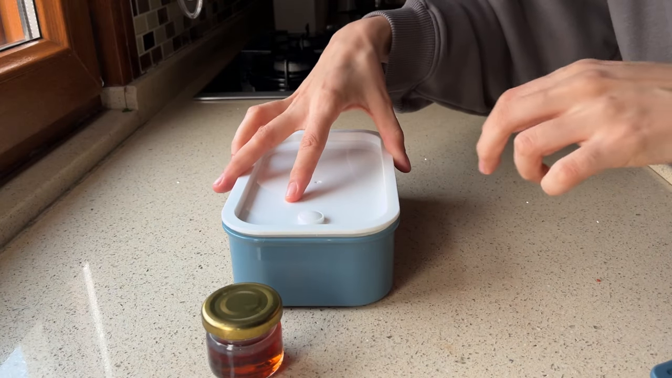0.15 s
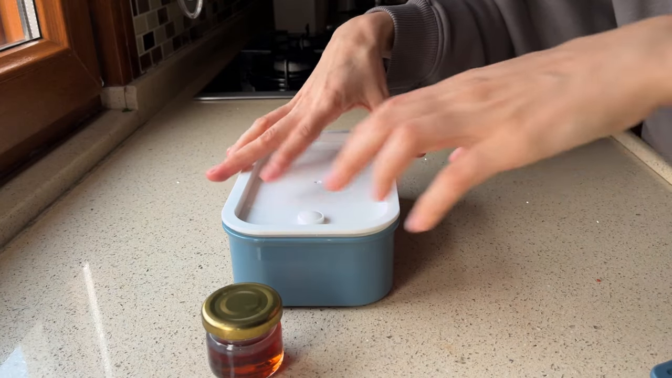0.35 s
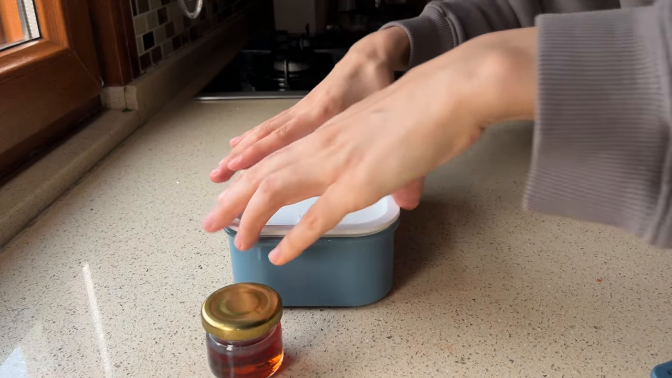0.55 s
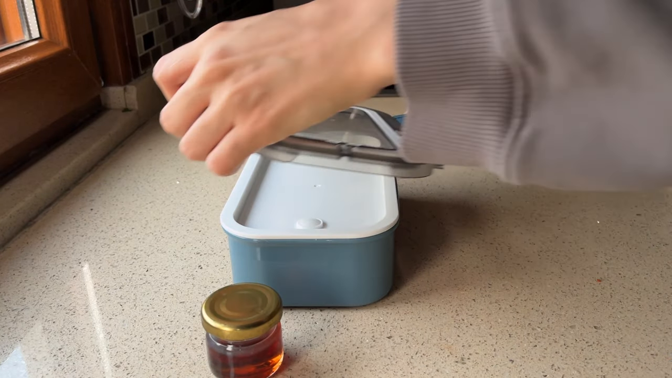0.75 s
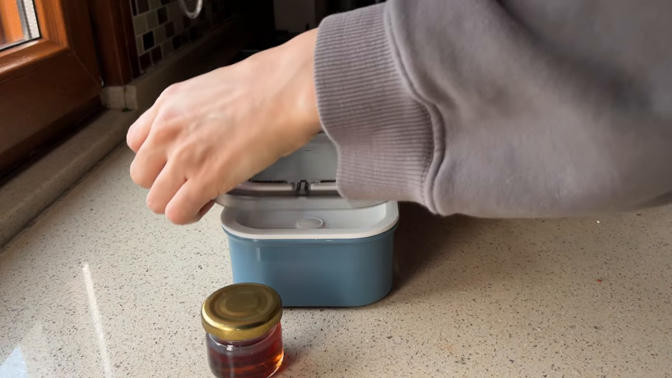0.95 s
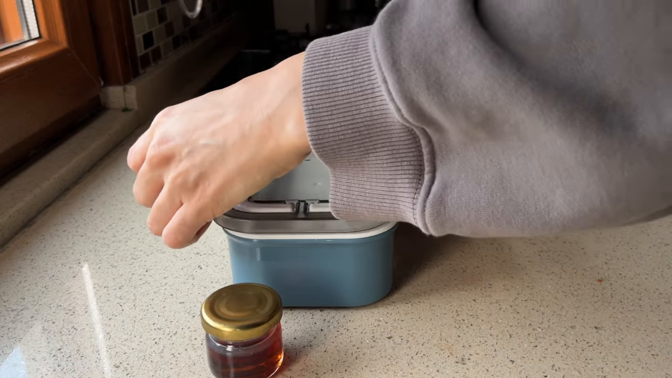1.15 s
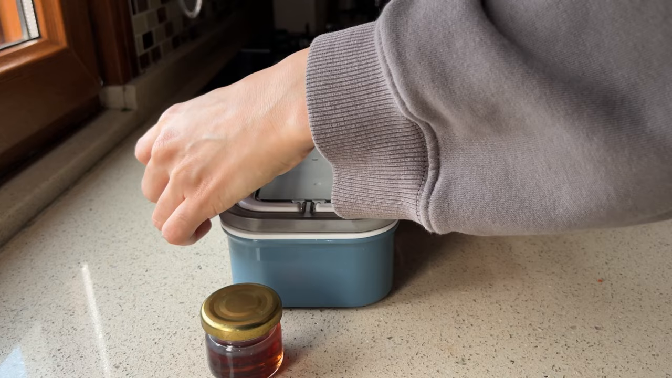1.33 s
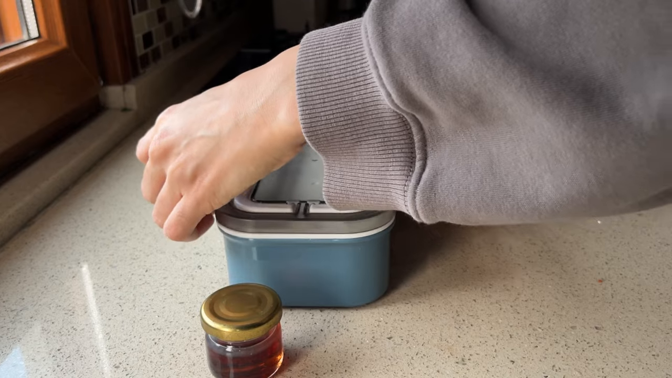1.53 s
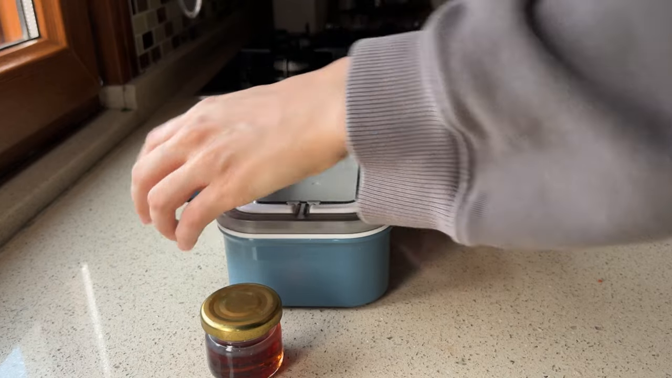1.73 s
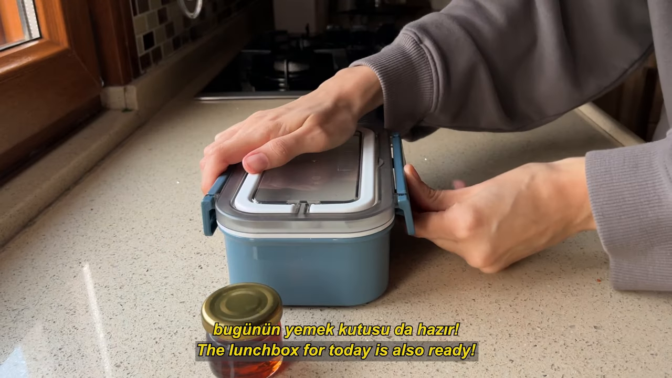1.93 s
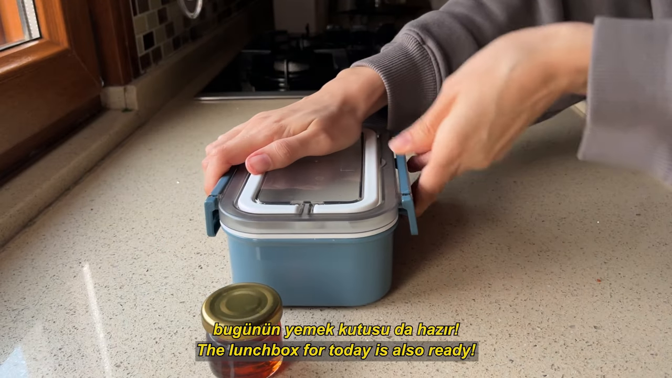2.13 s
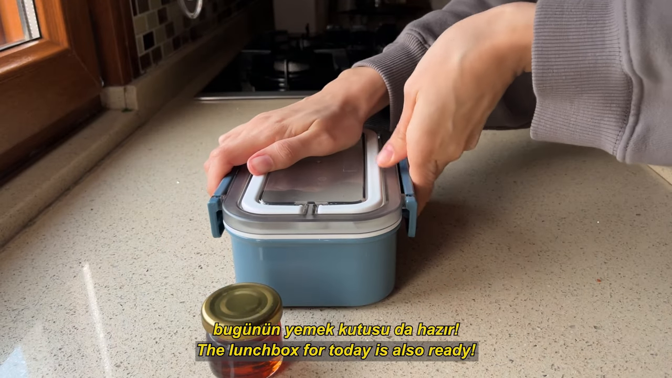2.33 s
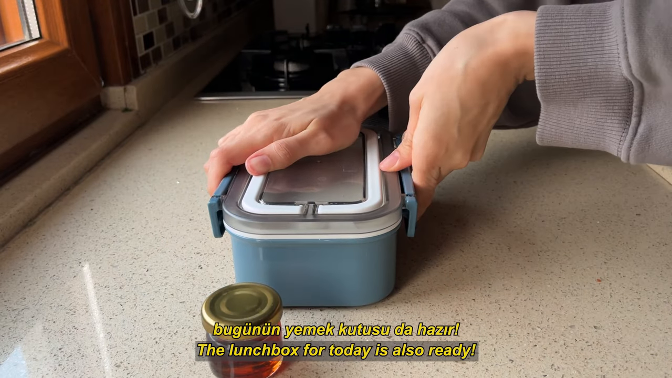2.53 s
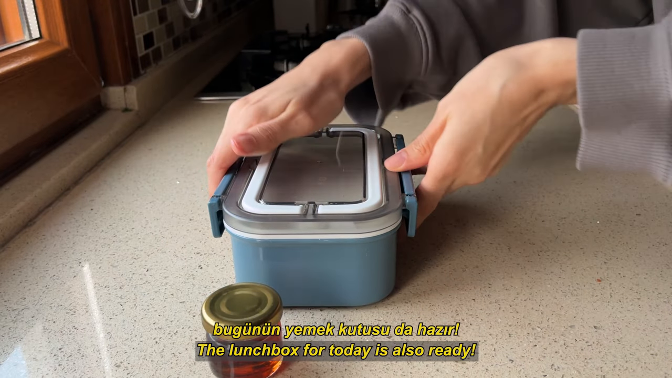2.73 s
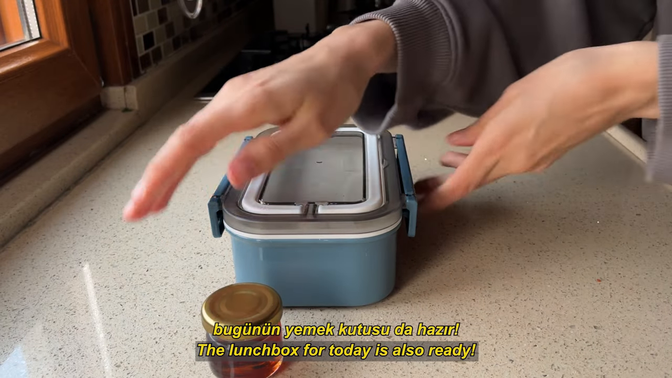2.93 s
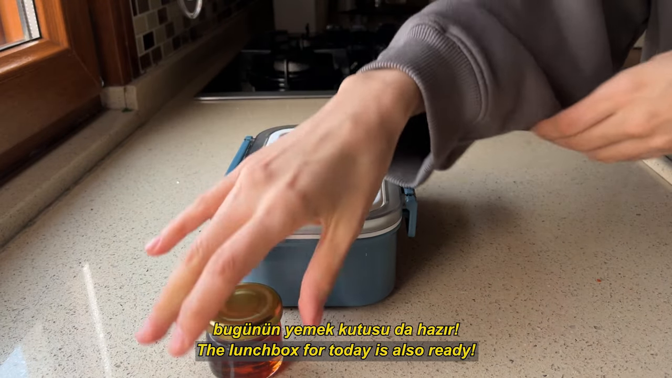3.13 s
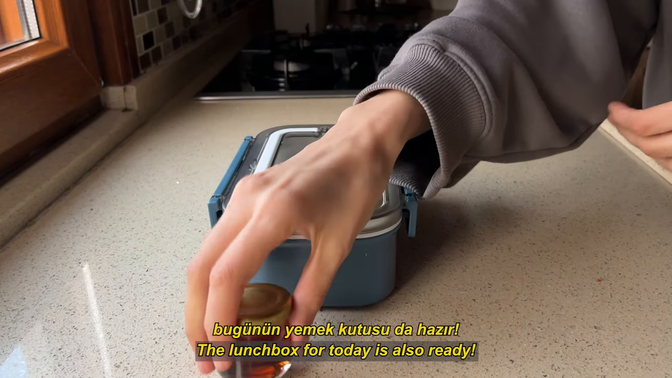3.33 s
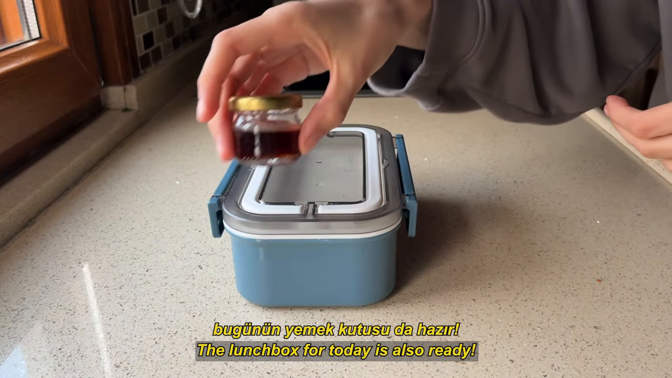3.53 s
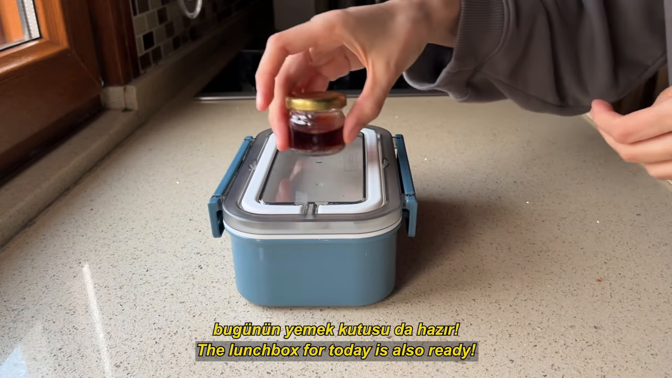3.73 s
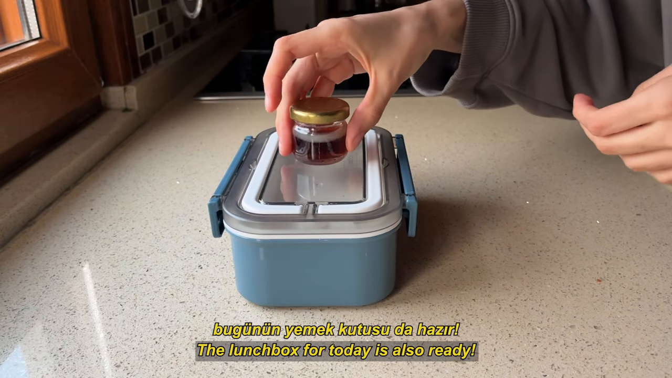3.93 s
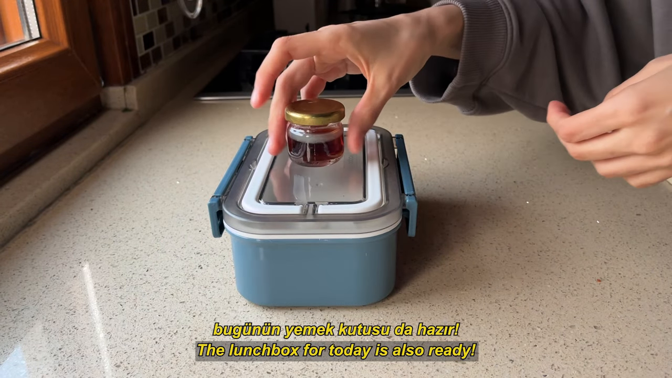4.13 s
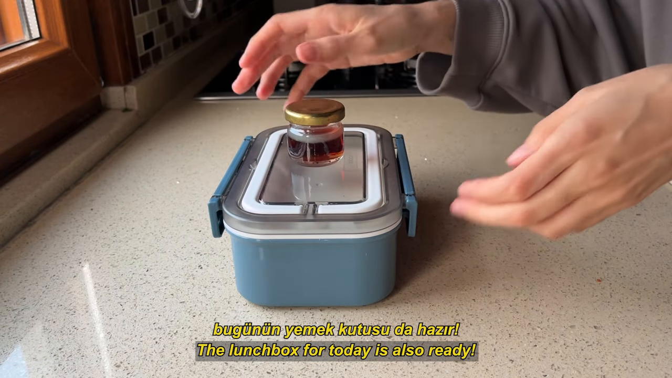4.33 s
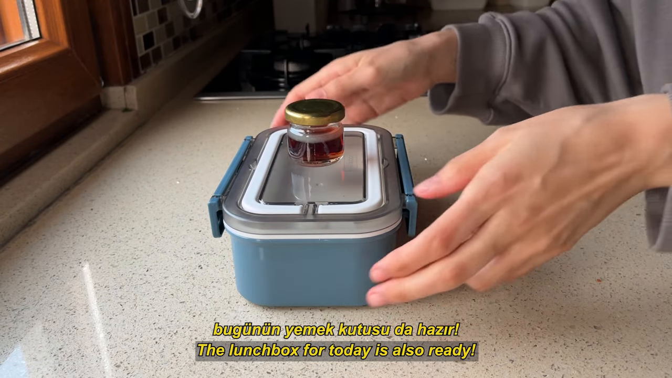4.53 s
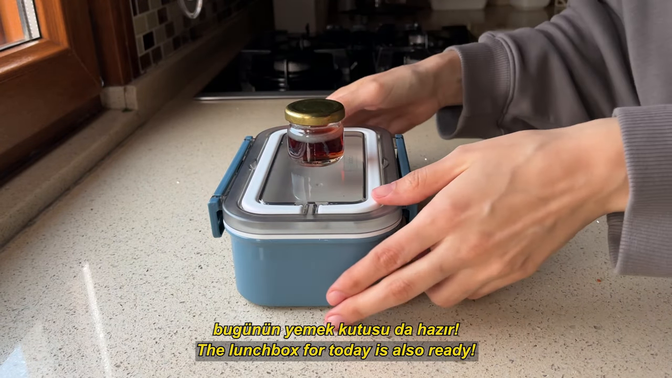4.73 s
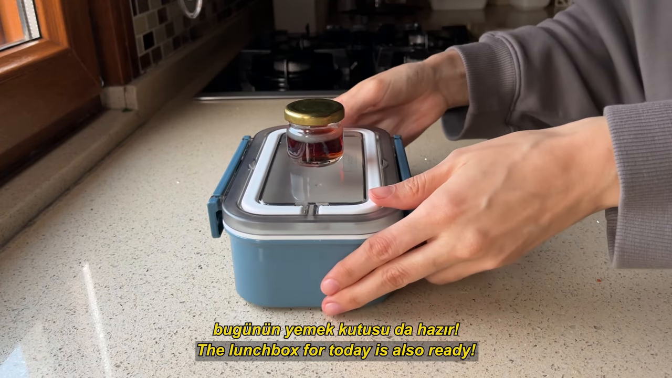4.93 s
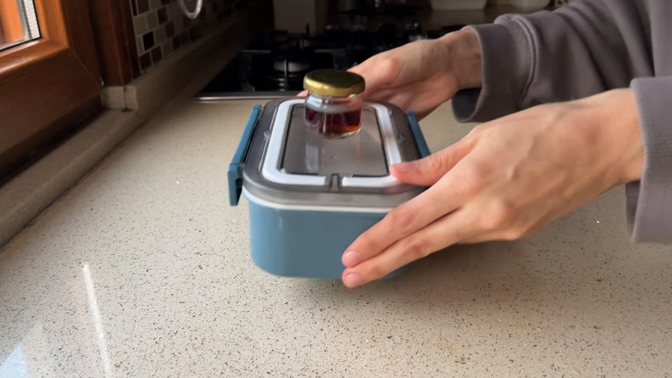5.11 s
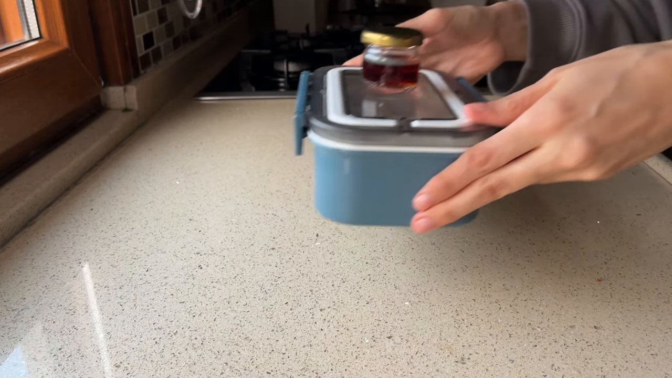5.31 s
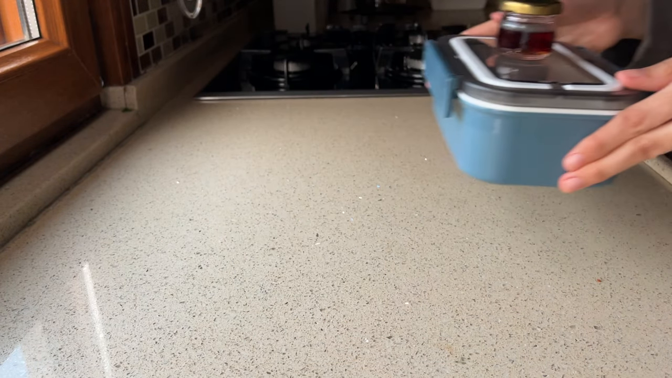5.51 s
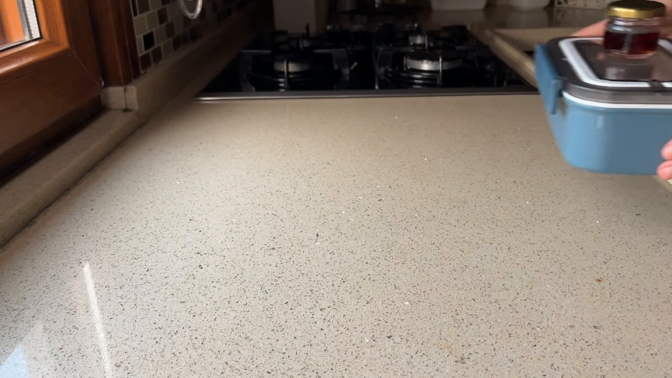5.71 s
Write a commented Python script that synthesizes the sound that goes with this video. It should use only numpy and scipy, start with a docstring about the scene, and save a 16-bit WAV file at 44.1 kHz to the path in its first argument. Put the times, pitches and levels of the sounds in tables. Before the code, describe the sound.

Close stereo microphones in a small hard kitchen catch soft finger knocks on a plastic box, then a loose lid clattering and settling with dull tocks. A tight burst of latch snaps follows, far louder than everything else. Afterwards a small glass jar scrapes briefly off stone and clunks onto the lid, and the box is lifted away almost silently over faint low house rumble.

```python
"""Latches of a plastic lunch box snap shut on a stone kitchen counter, close to a pair of microphones.
Each snap is a dispersed crack with damped modes of tab, arm and shell. Before it the inner lid is pressed
and the outer lid clatters into place: blows sum tick, tub ring and thump, and rubs are random slips.
A small jar then drags over the stone as filtered slips and lands on the lid, and the box is lifted away.
A small hard room answers with a decaying diffuse tail, over a low noise of the house."""
import sys
import numpy as np
from scipy import signal
from scipy.fft import rfft, irfft
from scipy.io import wavfile
from scipy.ndimage import uniform_filter1d

SR = 44100
rng = np.random.default_rng(int(sys.argv[2]) if len(sys.argv) > 2 else 0)


def unload_audio(sound):
    """Save the sound as a 16-bit wav file, at the path given as the first command line argument."""
    columns = np.transpose(np.atleast_2d(sound))
    # keep every value between -1 and 1, then stretch to whole-number steps
    steps = np.round(np.clip(columns, -1, 1) * 32767)
    wavfile.write(sys.argv[1], SR, steps.astype(np.int16))


N = 254456
T = np.arange(int(.6 * SR)) / SR  # time within one event, s
CLOCK = np.arange(N) / SR  # time within the scene, s

# In mode tables levels are relative, before random scatter; in spectra they are relative power densities.
# Component levels of an event are relative to its own level, before the gains common to all its kind.

# Latches catching and snapping over the rim. Each row: start in seconds, level in dB, crack in dB,
# pitch factor of the tab, shudder of the walls in dB, bent arm in dB, pitch factor of the arm.
SNAPS = [(2.2696, -28, 6.5, 1.04, -12, 3, 0.81), (2.2829, -19.5, 11.5, 0.87, -4, 1.5, 0.78),
         (2.2848, -21, -6, 0.67, -9, -2.5, 1.13), (2.2933, -27.5, -6.5, 1.2, -7.5, -8, .9),
         (2.3250, -20.5, -1.5, 1.45, -7.5, -5.5, 0.76), (2.3274, -24, -12, 0.61, -14, -13.5, 1.05),
         (2.3645, 0, 0, 0.97, -28, -11, 1.0), (2.3682, -16, -8, 0.97, -14, -14, 1.0),
         (2.3725, -27, -0.5, 1, -14.5, 3, 0.92)]
# Modes of the latch tab. Each row: frequency in Hz before the pitch factor, level in dB, t60 in seconds.
TAB_MODES = [(680, -3, 0.012), (983, -1, 0.0099), (1386.4, -12, 0.0099), (298, -32.5, .06)]
# Modes of the closed shell. Each row: frequency in Hz before the pitch factor, level in dB, t60 in seconds.
SHELL_MODES = [(736, -1.5, 0.095), (948, -1, .13), (1375, -2, .12), (1600, -4, .12), (1750, -8.5, 0.2),
               (2380, -9, 0.068), (3076, -12, 0.1), (3288, -10.5, .1), (3885, -8, .1)]
# Crack of a latch before its tilt. Each row: frequency in Hz, level in dB per Hz.
CRACK_SPECTRUM = [(300, -21), (1200, -5), (1700, 7), (2100, -1.5), (4200, -2), (6500, 0.5), (10000, 0),
                  (11800, -14), (14500, -11.5), (16000, -18.5)]
# Stirred box walls. Each row: frequency in Hz, level in dB per Hz.
WALL_SPECTRUM = [(60, -20.5), (200, -3.5), (480, -8), (660, 7.5), (1150, 0.5), (1600, -4), (2200, -13),
                 (4500, -26.5), (9000, -41), (16000, -63)]
# Box and counter under a blow. Each row: frequency in Hz, level in dB per Hz.
THUMP_SPECTRUM = [(30, -22.5), (65, -8), (130, -9.5), (220, -5.5), (350, -7.5), (700, -27.5), (2000, -85)]
SHELL_DB = -28.5  # ring of the closed shell relative to a snap
# each snap jolts the whole box: pitch (Hz), level (dB), t60 (s), share lost as the snap grows (dB per dB)
JOLT_HZ, JOLT_DB, JOLT_T60, JOLT_LOSS = 192, -42, 0.17, 0.65


def latches():
    """Snap-through: a stiff tab jumps the rim, exciting a crack, tab and shell modes, walls and a jolt."""
    out = np.zeros(N)
    for s, db, crack_db, pitch, walls_db, _, _ in SNAPS:
        tab = amp(-2.0) * ring(TAB_MODES, pitch, scatter_db=3.5)
        wave = click(CRACK_SPECTRUM, tilt_db=-0.5, lag=.0016)
        crack = amp(crack_db - 5.5) * chatter(wave, t60=0.0037, count=11)
        crackle = grit(WALL_SPECTRUM, per_s=980, spread_db=3.5)
        walls = amp(walls_db + 2.0) * crackle * fade(t60=0.045) * swell(rise=0.0047)
        shell = amp(SHELL_DB) * ring(SHELL_MODES, 0.91, scatter_db=0.5) * swell(rise=.002)
        box = np.sin(2 * np.pi * JOLT_HZ * T) + amp(-3.5) * noise(THUMP_SPECTRUM, len(T))
        jolt = amp(JOLT_DB - JOLT_LOSS * db) * box * fade(JOLT_T60) * swell(rise=0.0056)
        add(out, s, amp(db) * (crack + walls + shell + jolt))
        add(out, s + .0004, amp(db) * tab)
    return out


# Modes of a latch arm. Each row: frequency in Hz before the pitch factor, level in dB, t60 in seconds.
ARM_MODES = [(1850, -3.5, 0.024), (2470, -3, .016), (3050, -13.5, .02), (4147, -2, 0.015),
             (5520, -5.5, .011), (6000, -4.5, 0.0052), (6530, -7, .013), (7530, -2.5, .014),
             (9800, -3.5, 0.019)]


def latch_arms():
    """Free vibration of a bent beam: each snap sets the latch arm ringing in brief damped modes."""
    out = np.zeros(N)
    for s, db, _, _, _, arm_db, pitch in SNAPS:
        arm = ring(ARM_MODES, pitch, scatter_db=2.0) * swell(rise=.0003)
        add(out, s, amp(db + arm_db) * arm)
    return out


# The loose outer lid lands and rattles on the box. Each row: start in seconds, level in dB,
# free ring in dB, tick in dB, pitch factor of the ring, thump in dB at a middling blow, thump in Hz.
CLATTER = [(1.045, -36, 11.5, -0.5, 0.98, -3.5, 106), (1.0724, -41, 2, 1, 1, 5, 207),
           (1.0892, -44, 8, 5, 0.97, 1, 188), (1.104, -33.5, 8, 9, 0.95, -16, 187),
           (1.1081, -37.5, 2.5, -1, 0.83, 8, 84), (1.115, -39.5, 2, 2.5, 1.0, -5.5, 175),
           (1.158, -60, -11, -10, 0.71, -2, 120), (1.1919, -49, 7, -6, 1, 4, 223),
           (1.2281, -43, 1, 1.5, 0.965, 1, 236), (1.307, -59.5, -20, -22, 0.96, 4.5, 124)]
# Modes of the free lid. Each row: frequency in Hz before the pitch factor, level in dB,
# t60 in seconds before the hand's damping.
LID_MODES = [(357, -4.5, 0.16), (927, -3.5, 0.057), (1095, -0.5, 0.061), (1200, 1.5, 0.035),
             (1447, -3, 0.03), (1565, 2, 0.044), (1670, 0.5, 0.08), (1723, -4, .04), (2030, -11, 0.04),
             (2440, -10, 0.073), (3300, -19, 0.067), (4040, -20, 0.02), (4300, -22, .02),
             (4900, -15, 0.025), (5460, -13.5, 0.019)]
# Buzz of the loose lid against the rim. Each row: frequency in Hz, level in dB per Hz.
BUZZ_SPECTRUM = [(700, -10), (1050, 6), (1280, -19), (1480, 0), (1630, 3), (1760, -19), (1950, -14),
                 (2400, -10), (2900, -25), (4500, -28), (8000, -40)]


def clatter():
    """Repeated impact of a free plate: the loose lid knocks, rings in its modes and buzzes on the rim."""
    out = np.zeros(N)
    for s, db, free_db, tick_db, pitch, thump_db, thump_hz in CLATTER:
        slips = grit(BUZZ_SPECTRUM, per_s=690, spread_db=2)
        buzz = amp(-11.5) * slips * fade(t60=0.11) * swell(rise=0.0015)
        free = ring(LID_MODES, pitch, scatter_db=3.5) + buzz
        held = amp(db + free_db) * free * fade(t60=0.078)  # the hand damps it
        add(out, s, held + knock(db, thump_db, thump_hz, tick_db, tilt_db=-1.5))
    return out


# Hard plastic edges flick against the rim. Each row: start in seconds, level in dB, tick in dB,
# thump in dB at a middling blow, rim ring in dB, tilt of that ring in dB per octave.
FLICKS = [(0.7838, -69.5, 15, -6, -14, -2), (1.5681, -48, 10, 10.5, -3, 14),
          (1.572, -32.5, 5.5, 1, 10, -1.5), (1.584, -46.5, 12, -8, 0, 4),
          (1.8246, -42.5, -0.5, 6.5, -9, 2.5), (2.029, -57, 6, -6, 3, 5), (2.052, -64, -7, -12, 5, 3),
          (2.121, -40, 0.5, -1.5, 9.5, -1), (2.572, -61.5, 18.5, -11, 11, 18),
          (2.607, -67, 17, -8.5, 12, 0), (2.707, -51.5, -17, 1, -19, 3), (5.415, -57.5, -14, 0.5, -15, 4)]


def flicks():
    """Impact of hard edges: short contact gives mostly a tick, with some thump."""
    out = np.zeros(N)
    for s, db, tick_db, thump_db, _, _ in FLICKS:
        add(out, s, knock(db, thump_db, thump_hz=143, tick_db=tick_db, tilt_db=-0.5))
    return out


# Modes of the rim. Each row: frequency in Hz, level in dB before the tilt, t60 in seconds.
RIM_MODES = [(680, -0.5, 0.012), (860, 0, 0.029), (1190, -2, .024), (1880, -11, .025), (2650, -17, .018),
             (3412, -11.5, 0.023), (4420, -13, 0.016), (5630, -24, 0.013), (7500, -26, .012)]


def rim_rings():
    """Modal response of the struck rim: the tilt of each flick favours its low or high modes."""
    out = np.zeros(N)
    for s, db, _, _, rim_db, tilt_db in FLICKS:
        rim = ring(RIM_MODES, 1.0, scatter_db=1.0, tilt_db=tilt_db) * swell(rise=0.00045)
        add(out, s, amp(db + rim_db) * rim)
    return out


# The outer lid rocks on its soft seal, then sinks into it. Each row: start in seconds, level in dB,
# thump in dB, panel tock in dB, pitch factor of the tock, hollow note in dB.
SEATINGS = [(1.3787, -41.5, 4, 2.5, 1.03, -21), (1.387, -43.5, 3.5, 3, 0.91, -13),
            (1.431, -48.5, 4, -5, 1.2, -23), (1.578, -40.5, 13, 3, 1.06, -22),
            (1.5827, -39, 3, 3.5, 0.91, 8)]
# Modes of a lid panel. Each row: frequency in Hz before the pitch factor, level in dB, t60 in seconds.
PANEL_MODES = [(699, 2, 0.058), (828, 1, 0.036), (967, 1.5, 0.019), (1194, -2.5, 0.014)]
HOLLOW_HZ, HOLLOW_T60 = 608, 0.07  # note of the sealed box: pitch (Hz), t60 (s)
SEAT_HZ, SEAL_HZ = 192, 1470  # pitch of the thump; the seal swallows the treble above this


def seatings():
    """Compliant contact as a low-pass: the seal dulls the blow, panel tock and hollow note."""
    out = np.zeros(N)
    for s, db, thump_db, tock_db, pitch, hollow_db in SEATINGS:
        tock = amp(tock_db) * ring(PANEL_MODES, pitch, scatter_db=-2.5)
        hollow = amp(hollow_db) * np.sin(2 * np.pi * HOLLOW_HZ * T) * fade(HOLLOW_T60)
        impact = blow(thump_db, SEAT_HZ, tick_db=8, tilt_db=1.5)
        add(out, s, amp(db) * muffle(tock + hollow + impact, SEAL_HZ))
    return out


# Fingers push a lid down or take hold of the box. Each row: start in seconds, level in dB,
# thump in dB at a middling blow, tick in dB, panel tock in dB, pitch factor of the tock.
PRESSES = [(0.0187, -41, -3, 7.5, 4, 1.07), (0.0271, -31, -5, -0.5, -14, 0.84),
           (0.0548, -36, 2, -5, -3, 1.85), (0.165, -39, -1, 2, -5.5, 1.9), (0.543, -57, 4, -16, -1, 1.8),
           (4.7746, -58.5, -1, -10, 4.5, 1.38), (5.378, -54, -1.5, -9, 0, 0.96)]


def presses():
    """Soft impact: fingers excite a dull knock and the panel's damped modes."""
    out = np.zeros(N)
    for s, db, thump_db, tick_db, tock_db, pitch in PRESSES:
        tock = amp(db + tock_db) * ring(PANEL_MODES, pitch, scatter_db=-1.5)
        add(out, s, tock + knock(db, thump_db, thump_hz=201, tick_db=tick_db, tilt_db=-8.0))
    return out


# Plastic rubs on plastic. Each row: start in seconds, length in seconds, level in dB, creak in dB,
# hiss in dB, treble edge of the walls in Hz.
RUBS = [(0.0, 0.029, -48.5, -39, -26, 3000), (0.142, 0.023, -53, -10, -23.5, 3000),
        (1.544, 0.069, -47.5, -32, -18.5, 1040), (1.827, 0.076, -50, -9.5, -18.5, 2540),
        (2.021, 0.054, -62.5, 5, -8.5, 5000), (4.915, 0.035, -65.5, 4, -12, 3000),
        (4.938, 0.047, -68.5, 8.5, -10, 3005), (5.15, 0.032, -81, 6, -12, 3008),
        (5.371, 0.036, -66.5, 1, -8, 3000), (5.467, .015, -80, 9, -2, 2996)]
# Creaking plastic. Each row: frequency in Hz, level in dB per Hz.
CREAK_SPECTRUM = [(600, -29.5), (1250, -11), (1520, -1), (1750, -9), (1980, 2), (2200, -7.5), (2600, -14),
                  (4200, -17), (8000, -47)]
# Hiss of a rubbed surface. Each row: frequency in Hz, level in dB per Hz.
HISS_SPECTRUM = [(400, -21), (1800, -7), (4000, -1.5), (7000, -1.5), (11000, -1.5), (16000, -8)]


def rubs():
    """Stick-slip friction: rubbing plastic stirs the walls, hisses and creaks in little slips."""
    out = np.zeros(N)
    for s, length, db, creak_db, hiss_db, edge_hz in RUBS:
        walls = muffle(noise(WALL_SPECTRUM, len(T)), edge_hz)
        hiss = amp(hiss_db) * grit(HISS_SPECTRUM, per_s=1200, spread_db=1)
        creak = amp(creak_db - 4.5) * grit(CREAK_SPECTRUM, per_s=550, spread_db=3.0)
        add(out, s, amp(db) * stroke(length, catch_db=10.5) * (walls + hiss + creak))
    return out


# Skin and sleeve brush over the box. Each row: start in seconds, length in seconds, level in dB.
BRUSHES = [(0.324, 0.33, -83.5), (1.229, 0.26, -80.5), (2.572, 0.077, -71), (2.697, 0.13, -69.5),
           (3.129, 0.0862, -79), (5.133, 0.051, -83.5), (5.343, 0.061, -77.5)]


def brushes():
    """Friction noise: skin and cloth give steady hiss and wall noise under an uneven grip."""
    out = np.zeros(N)
    for s, length, db in BRUSHES:
        hiss = noise(HISS_SPECTRUM, len(T))
        walls = amp(-1.5) * noise(WALL_SPECTRUM, len(T))
        creak = amp(-19.0) * noise(CREAK_SPECTRUM, len(T))
        add(out, s, amp(db) * stroke(length, catch_db=7.5) * (hiss + walls + creak))
    return out


# Modes of the filled jar. Each row: frequency in Hz, level in dB, t60 in seconds.
JAR_MODES = [(567, -4.5, 0.029), (920, 0, 0.041), (1047, -2, 0.025), (1660, -14.5, 0.023),
             (1999, -18.5, 0.018), (2402, -8, 0.018)]
# Scraped stone. Each row: frequency in Hz, level in dB per Hz.
STONE_SPECTRUM = [(150, -2.5), (350, -8), (550, 0), (950, -7.5), (1400, -8), (2000, -4), (2600, -43),
                  (3200, -22), (4400, -27.5), (5500, -37.5), (16000, -42)]
# the jar's foot drags on the stone: full contact from (s), for (s), at (dB)
DRAG_S, DRAG_HOLD_S, DRAG_DB = 3.262, 0.044, -46
# it bites quickly, then tips onto its edge and scrapes away
DRAG_BITE_DB_PER_S, DRAG_TIP_DB, DRAG_LIFT_DB_PER_S = 1117, -7, 173
# the scrape dulls as the weight comes off: time constant (s), final treble edge (Hz)
DRAG_DULLING_S, DRAG_DULL_HZ = 0.0085, 1973


def jar_drag():
    """Friction-driven resonance: uneven slips on the stone excite the jar's modes, then dull and fade."""
    slips = rng.standard_normal(N) * amp(4.26 * rng.standard_normal(N))
    glass = unit(signal.fftconvolve(slips, ring(JAR_MODES, 1, scatter_db=1))[:N])
    scrape = glass + amp(-4.0) * noise(STONE_SPECTRUM, N)
    before = np.maximum(DRAG_S - CLOCK, 0)
    after = np.maximum(CLOCK - DRAG_S - DRAG_HOLD_S, 0)
    bite_db = -DRAG_BITE_DB_PER_S * before
    lift_db = DRAG_TIP_DB * (after > 0) - DRAG_LIFT_DB_PER_S * after
    contact = np.exp(-after / DRAG_DULLING_S)
    dulling = contact * scrape + (1 - contact) * muffle(scrape, DRAG_DULL_HZ)
    return amp(DRAG_DB + bite_db + lift_db) * dulling


# The jar lands on the lid, one edge after the other. Each row: start in seconds, level in dB,
# thump in dB, ring of the laden lid in dB, ring of the jar in dB, high ring of its glass in dB, tick in dB.
LANDINGS = [(3.9654, -36.5, 7.5, 4.5, -15, -7, 2.5), (4.0479, -39.5, 7, -2.5, 0.5, 1.5, 7),
            (4.0558, -40.5, -2.5, -1.5, 0, -22, -9)]
# Modes of the lid under the jar. Each row: frequency in Hz, level in dB, t60 in seconds.
LADEN_LID_MODES = [(314, -1.5, 0.078), (453, 2.5, 0.087), (577, 0, 0.13), (960, -16, 0.049),
                   (2710, -6, 0.029), (3036, -1, 0.011), (4480, -1.5, 0.0094)]
# High modes of the jar's glass. Each row: frequency in Hz, level in dB, t60 in seconds.
GLASS_MODES = [(1534, 1, 0.054), (1694, 7, 0.031), (1970, -4, .045), (2150, -4, 0.038), (2670, -7, 0.039),
               (2870, 8, 0.02), (3140, 10.5, 0.02), (3320, 5, 0.022), (3770, -3, 0.018), (4200, -12, 0.018),
               (5070, -16, 0.016), (7550, -21, 0.013)]
LADEN_THUMP_HZ = 211


def jar_landings():
    """Impact of two resonators: each touch rings both the laden lid and the jar, over a blow to the box."""
    out = np.zeros(N)
    for s, db, thump_db, lid_db, jar_db, glass_db, tick_db in LANDINGS:
        clack = amp(lid_db) * ring(LADEN_LID_MODES, 1, scatter_db=2)
        body = amp(jar_db) * ring(JAR_MODES, 1, scatter_db=1)
        glass = amp(glass_db) * ring(GLASS_MODES, 1, scatter_db=2)
        impact = blow(thump_db, LADEN_THUMP_HZ, tick_db, tilt_db=-2.5)
        add(out, s, amp(db) * (impact + clack + body + glass))
    return out


# a middling blow (dB), thump lost (dB per dB above it), tilt gained (dB per octave per dB above it)
MIDDLING_DB, THUMP_LOSS, BRIGHTENING = -37, 0.44, 0.36


def knock(db, thump_db, thump_hz, tick_db, tilt_db):
    """Nonlinear contact: the firmer the blow, the brighter it is and the smaller its share of thump."""
    force_db = db - MIDDLING_DB
    thump_db = thump_db - THUMP_LOSS * force_db
    return amp(db) * blow(thump_db, thump_hz, tick_db, tilt_db + BRIGHTENING * force_db)


# Modes of the tub. Each row: frequency in Hz, level in dB, t60 in seconds.
TUB_MODES = [(293, -8, .09), (422, -10, 0.11), (594, 0, 0.048), (716, -8.5, 0.017), (843, -3, 0.043),
             (960.6, -2, .035), (1190, -9.5, 0.02)]
# Tick of hard plastic before its tilt. Each row: frequency in Hz, level in dB per Hz.
TICK_SPECTRUM = [(300, -13), (1600, 4.5), (2100, 0), (3800, -4), (6000, -6), (10000, -8.5), (12500, -17),
                 (16000, -21.5)]


def blow(thump_db, thump_hz, tick_db, tilt_db):
    """Impulse response of the box: a blow ticks, rings the tub and thumps; grip and load set the thump's pitch."""
    tub = amp(0.5) * ring(TUB_MODES, 1.0, scatter_db=-1)
    walls = amp(-5.5) * noise(WALL_SPECTRUM, len(T)) * fade(t60=0.02)
    body = (tub + walls) * swell(rise=.0004)
    tick = amp(-2.5) * chatter(click(TICK_SPECTRUM, tilt_db, lag=.0015), t60=.016, count=26)
    box = amp(-4.5) * np.sin(2 * np.pi * thump_hz * T) * fade(t60=0.087)
    counter = amp(-7.5) * noise(THUMP_SPECTRUM, len(T)) * fade(t60=.13)
    thump = (box + counter) * swell(rise=0.00051)
    return body + amp(tick_db) * tick + amp(thump_db) * thump


def ring(modes, pitch, scatter_db, tilt_db=0):
    """Modal superposition with peak 1: point of contact scatters the shares, hardness tilts them per octave."""
    chance = rng.standard_normal((len(modes), 2))
    y = 0
    for k, (hz, db, t60) in enumerate(modes):
        detune = 1 + .004 * chance[k, 1]
        octaves = np.log2(hz / modes[0][0])
        share = amp(db + scatter_db * chance[k, 0] + tilt_db * octaves)
        mode = fade(t60) * np.sin(2 * np.pi * hz * pitch * detune * T)
        y = y + (-1) ** k * share * mode
    return y / np.abs(y).max()


def click(spectrum, tilt_db, lag):
    """Bending-wave dispersion, peak 1: treble outruns bass, and 1 kHz arrives after lag seconds."""
    khz = bins(T) / 1000
    db = at(spectrum, bins(T)) + tilt_db * np.log2(np.maximum(khz, 1))
    # folding the cepstrum onto positive time gives the minimum-phase pulse
    cepstrum = irfft(np.log(amp(db)), len(T))
    causal = rfft(cepstrum * (1 + np.sign(T[-1] / 2 - T)) * (T > 0))
    travel = np.exp(-4j * np.pi * 1000 * lag * np.sqrt(khz))
    y = irfft(np.exp(causal) * travel, len(T)) * fade(t60=0.08)
    return y / np.abs(y).max()


def chatter(wave, t60, count):
    """All-pass delay: many treble modes each hold back a little of a wave without colouring it."""
    radius = np.exp(-np.log(1000) / (t60 * SR))
    angle = 2 * np.pi * rng.uniform(1500, 14000, count) / SR
    middle = -2 * radius * np.cos(angle)
    sections = [[radius ** 2, c, 1, 1, c, radius ** 2] for c in middle]
    return signal.sosfilt(sections, wave + 1e-18)  # the offset keeps the filter off vanishing numbers


def stroke(length, catch_db):
    """Sliding friction: the level breaks free, catches in fine and coarse grains, and slows to rest."""
    fine = uniform_filter1d(amp(7.1 * rng.standard_normal(len(T))), size=60)
    coarse = uniform_filter1d(amp(catch_db * rng.standard_normal(len(T))), size=260)
    grip = unit(uniform_filter1d(fine * coarse, size=16))
    slowing = np.sqrt(np.clip(1 - T / length, 0, 1))
    return grip * swell(rise=0.0041) * slowing


def grit(spectrum, per_s, spread_db):
    """Stick-slip as shot noise: a scatter of uneven little clicks, coloured by the surface, rms 1."""
    happens = rng.random(len(T)) < per_s / SR
    size = amp(spread_db * rng.standard_normal(len(T)))
    slips = happens * size * rng.choice([-1, 1], len(T))
    return unit(irfft(rfft(slips) * amp(at(spectrum, bins(T))), len(T)))


def muffle(x, hz):
    """Low-pass filtering: a soft contact loses the treble above hz."""
    return signal.sosfilt(signal.butter(4, hz, fs=SR, output="sos"), x)


def fade(t60):
    """Exponential damping: 60 dB down after t60 seconds."""
    return np.exp(-np.log(1000) * T / t60)


def swell(rise):
    """Exponential build-up of a vibration after contact; rise is its time constant in seconds."""
    return 1 - np.exp(-T / rise)


# Colour of the diffuse tail before the bands decay. Each row: frequency in Hz, level in dB per Hz.
ROOM_SPECTRUM = [(60, -5.5), (120, 4.5), (160, 1.5), (250, -8), (400, -1), (520, -4), (700, -4), (1050, -5),
                 (1400, 3), (2100, -1), (4000, 2), (7000, -5.5), (11000, -5.5), (16000, -9)]
# Decay of the kitchen. Each row: frequency in Hz, t60 in seconds.
ROOM_T60 = [(120, 0.57), (500, 0.4), (1500, 0.32), (4000, 0.3), (8000, 0.25), (12000, 0.29), (15000, 0.09)]
# Low standing waves. Each row: frequency in Hz, level in dB, t60 in seconds.
ROOM_MODES = [(130.3, -1, 0.7), (182.2, -1, 0.5), (201, -3.5, .25), (288, -10, 0.084)]


def kitchen(dry, wet_db, rise):
    """Reverberation: tiles and cupboards return a dense tail with its own decay per band, over standing waves."""
    field = rfft(diffuse(ROOM_SPECTRUM, len(T)))
    centres, t60s = np.transpose(ROOM_T60)
    tail = 0
    for share, t60 in zip(np.eye(len(centres)), t60s):
        band = at(np.column_stack([centres, share]), bins(T))  # overlapping bands sum to 1
        tail = tail + irfft(field * band, len(T)) * fade(t60)
    tail = even(tail * swell(rise) ** 2)
    tail = tail / np.sqrt(np.sum(tail ** 2) / 2)  # mean energy 1 per side
    standing = amp(-54.0) * ring(ROOM_MODES, 1.0, scatter_db=4.0)
    return signal.fftconvolve(dry[None], amp(wet_db) * tail + standing, axes=1)[:, :N]


def even(response):
    """Spectral equalization: chance humps and hollows are smoothed; overall colour and fine ripple stay."""
    spectrum = rfft(response)
    power = np.mean(np.abs(spectrum) ** 2, axis=0)
    humps = uniform_filter1d(power, size=40) / uniform_filter1d(power, size=200)
    flat = irfft(spectrum / np.sqrt(np.abs(humps) + 1e-6), len(T))
    return flat * swell(rise=.001) * (T < .5)


# Likeness of diffuse sound at the two sides. Each row: frequency in Hz, coherence from 0 to 1.
LIKENESS = [(130, 0.96), (300, 0.68), (650, 0), (1400, 0), (3000, 0.19)]


def diffuse(spectrum, size):
    """Diffuse-field coherence: noise from all sides is alike left and right chiefly in the bass, rms 1."""
    mid, side = noise(spectrum, size), noise(spectrum, size)
    alike = at(LIKENESS, bins(mid))
    mid = rfft(mid) * np.sqrt(1 + alike)
    side = rfft(side) * np.sqrt(1 - alike)
    return unit(irfft(np.array([mid + side, mid - side]), size))


# Background of the house. Each row: frequency in Hz, level in dB per Hz.
AIR_SPECTRUM = [(22, -12.5), (35, -10), (60, 2), (115, 0), (150, -9.5), (200, -9.5), (290, -19), (500, -26),
                (880, -20.5), (1200, -35), (2200, -42.5), (7500, -51), (12000, -52.5), (16000, -65.5)]
AIR_DB = -58


def house_rumble():
    """Stationary diffuse noise: the low rumble of the house holds one level throughout."""
    return amp(AIR_DB) * diffuse(AIR_SPECTRUM, N)


def noise(spectrum, size):
    """Spectral shaping: white noise takes on a spectrum, rms 1."""
    white = rng.standard_normal(size)
    return unit(irfft(rfft(white) * amp(at(spectrum, bins(white))), size))


def add(track, s, sound):
    """Superposition: mix a sound in at time s."""
    start = int(np.clip(s * SR, 0, N - 1))
    track[start:start + len(sound)] += sound[:N - start]


def amp(db):
    """Logarithmic level: decibels to gain."""
    return 10 ** (np.asarray(db) / 20)


def at(points, hz):
    """Interpolation of a table along a logarithmic frequency axis."""
    f, value = np.transpose(points)
    return np.interp(np.log(hz + 1), np.log(f), value)


def bins(x):
    """Fourier analysis: the frequencies of a signal's spectrum in Hz."""
    return np.fft.rfftfreq(x.shape[-1], 1 / SR)


def unit(x):
    """Normalization to rms 1."""
    return x / np.sqrt(np.mean(x ** 2))


def scene():
    """Superposition of direct handling sounds, their reverberation and the low rumble of the house."""
    snaps, arms, rim = latches(), latch_arms(), rim_rings()
    lids = clatter() + flicks() + seatings() + presses()
    handling = lids + rubs() + brushes() + jar_drag() + jar_landings()
    # arms and rim are beamed toward the microphones, so little of them reaches the walls
    spill = amp(-10)
    room = kitchen(snaps + handling + spill * (arms + rim), wet_db=-8.5, rise=0.00078)
    # level difference places the latches slightly to the right
    right_db = 3.0
    placed = amp(np.array([[-right_db], [right_db]]) / 2) * (snaps + arms)
    return placed + handling + rim + room + house_rumble()


# Left minus right. Each row: frequency in Hz, level difference in dB.
BALANCE_DB = [(100, 1.6), (400, 1.5), (700, 3), (1300, 2), (2400, 3.5), (4400, 6), (7000, 4.5),
              (14000, -3.5)]
TOP_HZ = 16300  # upper limit of the band


def record(dry):
    """Stereo processing: above about 5 kHz the right side repeats the left, its phase turning with frequency."""
    hz = bins(dry)
    low_cut = signal.butter(2, 36, "highpass", fs=SR, output="sos")
    left, right = rfft(signal.sosfilt(low_cut, dry))
    # the right side crossfades into the left's treble between 4.5 and 6 kHz
    shared = np.clip((hz - 4500) / 1500, 0, 1) * np.pi / 2
    turn = np.exp(2j * np.pi * (hz - 4400) / 7800)
    right = np.cos(shared) ** 2 * right + np.sin(shared) ** 2 * turn * left
    lean = amp(at(BALANCE_DB, hz) / 2)
    pair = irfft(np.array([left * lean, right / lean]), N)
    top_cut = signal.ellip(8, .2, 70, TOP_HZ, fs=SR, output="sos")
    return signal.sosfilt(top_cut, np.clip(pair, -.9, .9))


dry = scene()
out = record(dry)
unload_audio(out)
```